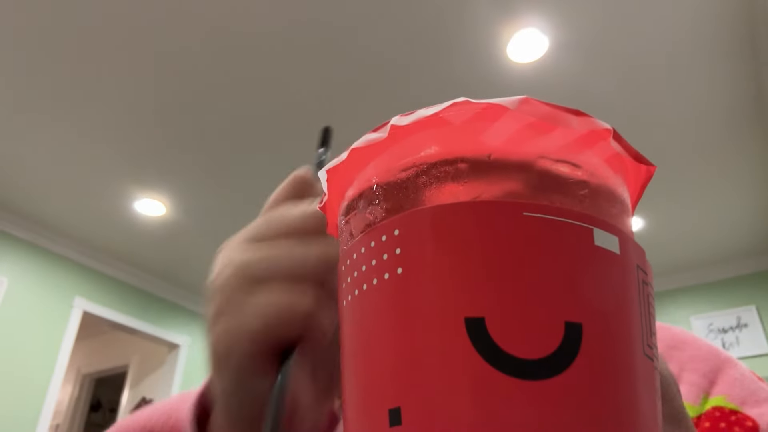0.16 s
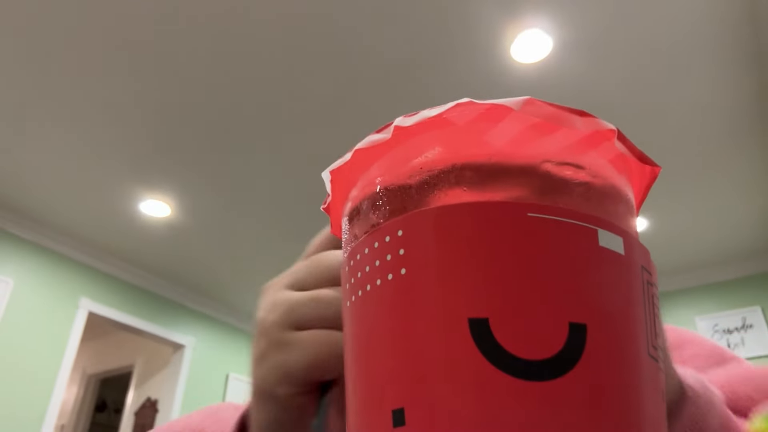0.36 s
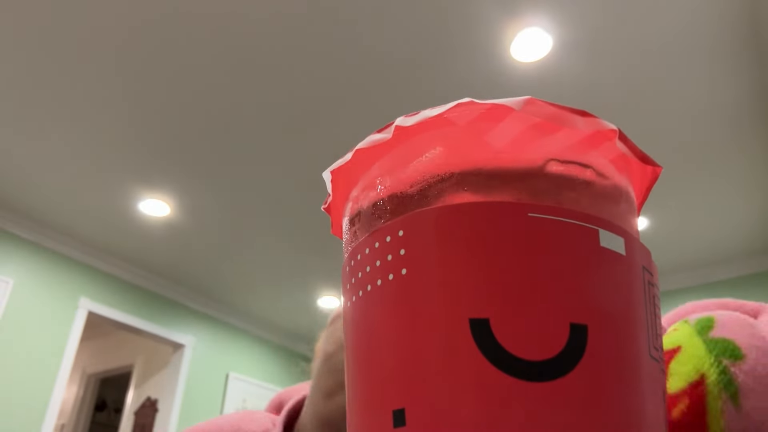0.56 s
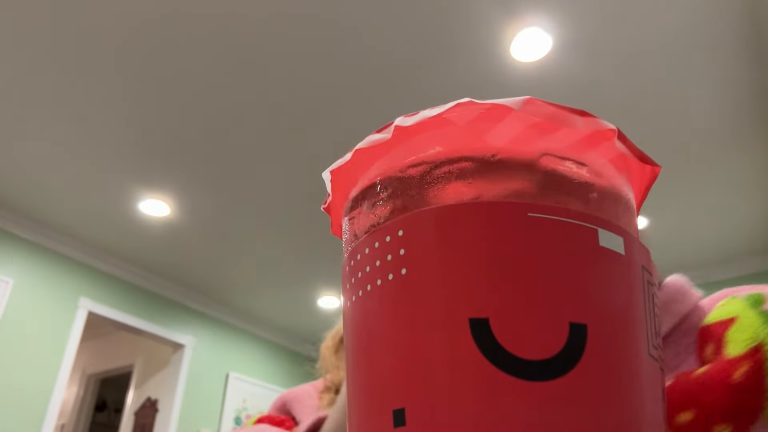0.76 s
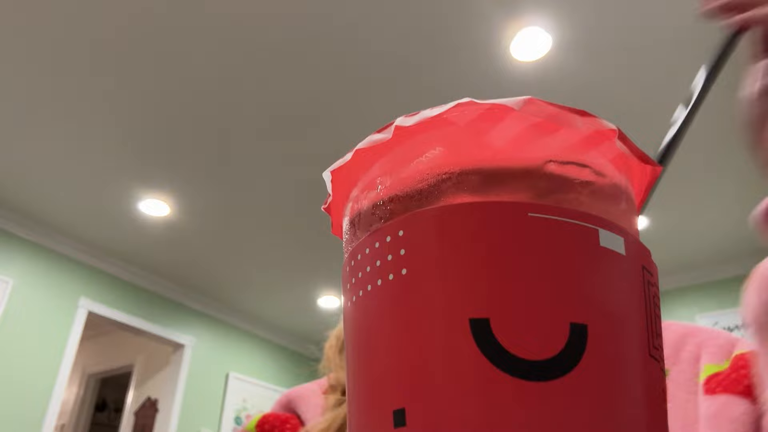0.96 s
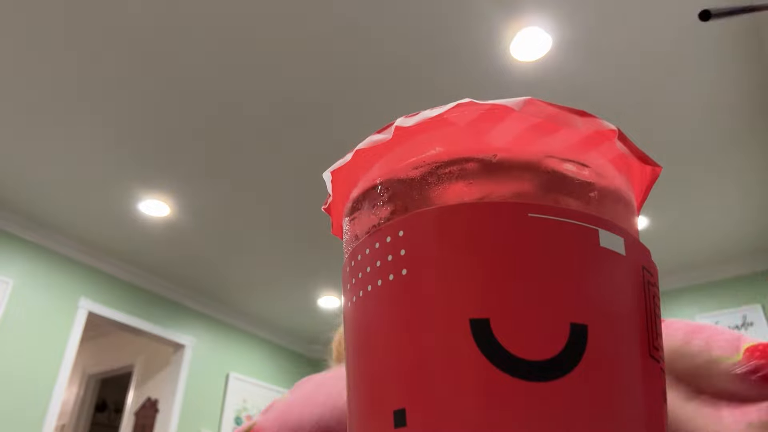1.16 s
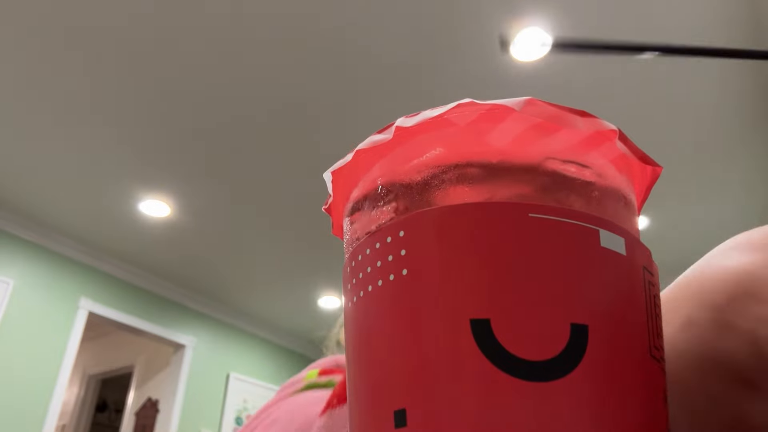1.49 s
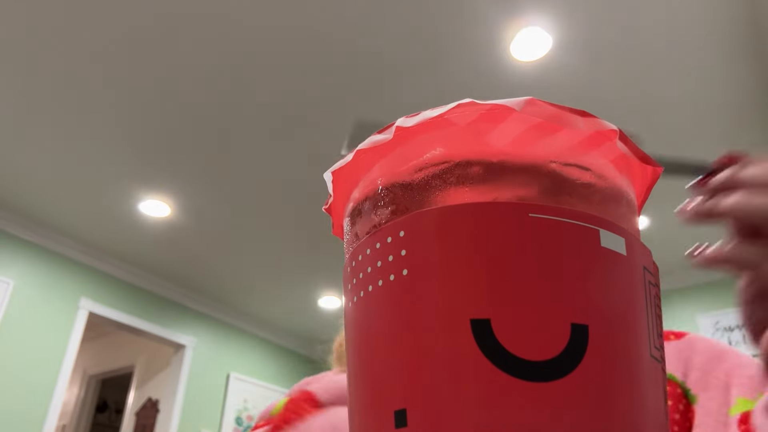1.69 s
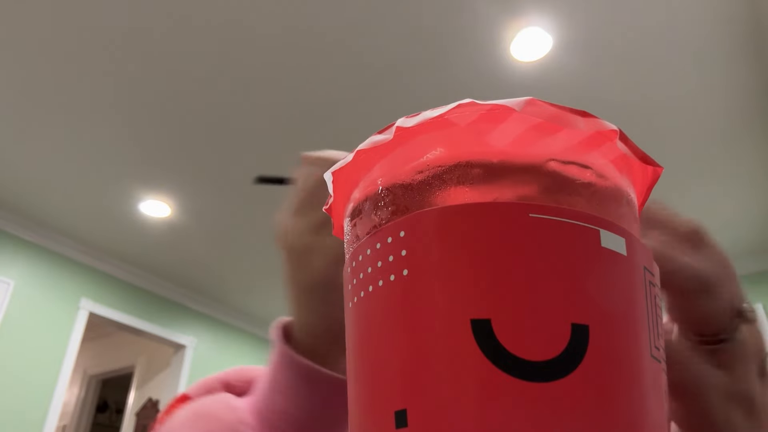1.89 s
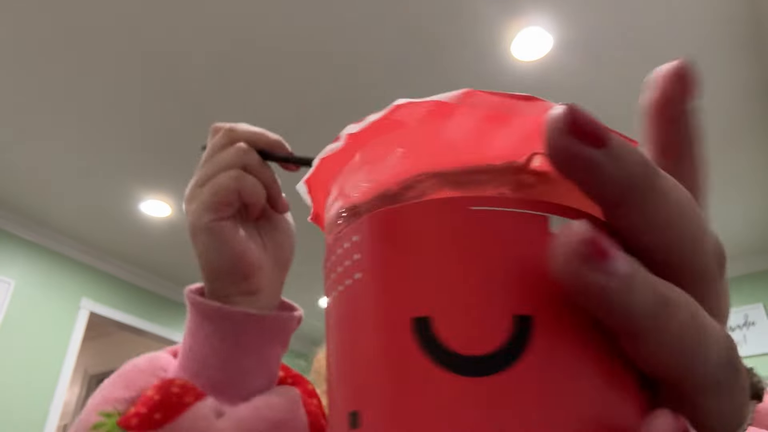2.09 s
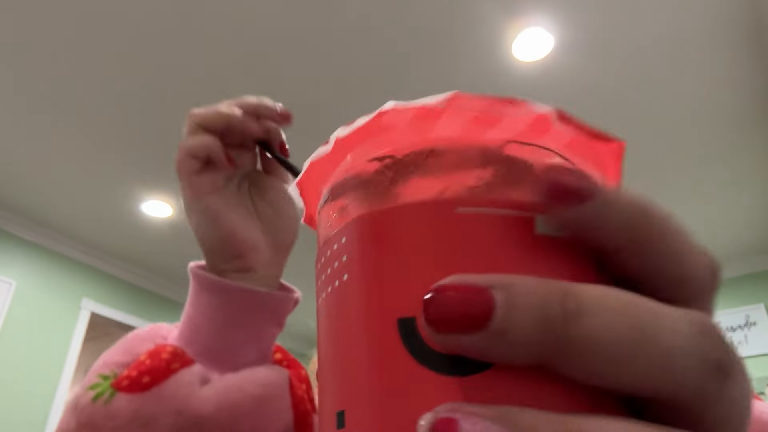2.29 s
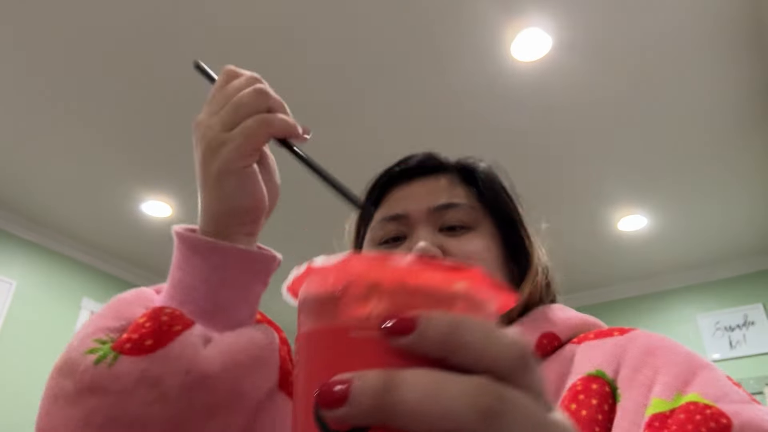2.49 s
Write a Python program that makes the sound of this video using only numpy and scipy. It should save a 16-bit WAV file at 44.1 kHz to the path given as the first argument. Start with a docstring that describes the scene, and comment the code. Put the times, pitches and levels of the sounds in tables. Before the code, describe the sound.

A plastic straw jabs at a drink cup's film lid, with taps, cracks and crinkling.

```python
"""A film-sealed drink cup is knocked about by a plastic straw and fingers, on a table beside a phone.
Blows ring the cup and thump the table, the straw taps, and thin plastic cracks, rasps and rustles.
At the end the cup is dragged and lifted, and its contents knock and rattle inside.
The phone's left port hears the bass weaker and phase-shifted, and the cup's low ring nearly inverted."""
import sys
import numpy as np
from scipy import signal
from scipy.fft import rfft, irfft, next_fast_len
from scipy.io import wavfile

SR = 44100
rng = np.random.default_rng(int(sys.argv[2]) if len(sys.argv) > 2 else 0)


def master(y):
    """Save y as 16-bit WAV."""
    cut = np.clip(np.atleast_2d(y).T, -1, 1)
    pcm = np.round(cut * 32767)  # scale
    wavfile.write(sys.argv[1], SR, pcm.astype(np.int16))


N = 116865


def undb(db):
    return 10 ** (np.asarray(db) / 20)


def unit(x):
    return x / np.sqrt(np.mean(x ** 2))


def noise(n=N):
    return rng.standard_normal(n)


def band(x, lo_hz, hi_hz):
    return signal.sosfilt(signal.butter(3, [lo_hz, hi_hz], "band", fs=SR, output="sos"), x)


def fader(table, column):
    points = np.array(table)
    return undb(np.interp(np.arange(N) / SR, points[:, 0], points[:, column]))


def fade(t, t60):
    return np.exp(-np.log(1000) * t / t60)


def ring(modes, detune=0.):
    """Struck modes dying away, peak 1; detune is their random pitch spread."""
    t = np.arange(SR // 6) / SR
    ratios = 1 + detune * noise(len(modes))
    y = sum(undb(db) * fade(t, t60) * np.sin(2 * np.pi * hz * ratio * t)
            for (hz, db, t60), ratio in zip(modes, ratios))
    return y / np.abs(y).max()


def add(out, start_s, sound, peak_db):
    i = int(start_s * SR)
    out[i:i + len(sound)] += (undb(peak_db) * sound / np.abs(sound).max())[:N - i]


def grains(per_s, spread_db):
    """Random tiny clicks, some larger than the rest."""
    clicks = (rng.random(N) < per_s / SR) * noise()
    return clicks * undb(spread_db * np.minimum(rng.exponential(size=N), 3))


def crinkle():
    """Sparse creases, each a short burst of noise, over a little hiss."""
    burst = fade(np.arange(SR // 50) / SR, t60=0.014)
    gate = signal.fftconvolve(np.abs(grains(per_s=250, spread_db=2.5)), burst)[:N]
    return (unit(gate) + 0.7) * noise()


# Fader moves for the table's rumble: time_s, low_db, high_db
RUMBLE_LEVELS = [(0.0, -28, -28.5), (0.15, -66.5, -91), (0.24, -30.5, -53), (0.38, -62, -67),
                 (0.47, -44, -57), (0.66, -74.5, -57), (0.92, -61, -71.5), (1.03, -67.5, -74),
                 (1.33, -67, -74), (1.59, -68, -49), (1.81, -65, -73.5), (1.98, -68.5, -69),
                 (2.14, -59.5, -112), (2.52, -63, -46), (2.65, -46.5, -89)]

def table_rumble():
    """The table top rumbles restlessly in two bass bands."""
    low = fader(RUMBLE_LEVELS, 1) * unit(band(noise(), 33, 110.3))
    high = fader(RUMBLE_LEVELS, 2) * unit(band(noise(), 200, 332))
    return undb(7) * low + undb(5) * high


# Fader moves for the plastic's rustle: time_s, treble_db, mid_db
RUSTLE_LEVELS = [(0.0, -51, -43), (0.11, -70.5, -80), (0.25, -68.5, -63), (0.5, -67, -65.5),
                 (0.59, -60, -50.5), (0.73, -49.5, -59), (0.8, -44, -63), (0.96, -62.5, -61.5),
                 (1.17, -58, -67.5), (1.48, -65.5, -60), (1.61, -57.5, -48.5), (1.75, -71.5, -67),
                 (1.94, -74.5, -72.5), (2.01, -53, -38.5), (2.12, -58, -41.5), (2.17, -67, -45.5),
                 (2.53, -55.5, -41.5), (2.65, -70, -99)]
# Tone of the film's treble: freq_hz, gain_db
FILM_EQ = [(3290, -42.5), (5600, -13), (7070, -15), (9510, -11), (11500, -8), (15000, -18), (16100, -40.5),
           (16400, -49)]

def film_rustle(grab_s=1.95):
    """Thin plastic rustles: bright fizz over crinkling mids, both swelling with each rasp."""
    freqs, eq = np.fft.rfftfreq(N, 1 / SR), np.array(FILM_EQ)
    colour = undb(np.interp(np.log(freqs + 1), np.log(eq[:, 0]), eq[:, 1], left=-60))
    fizz = unit(grains(per_s=1900, spread_db=4.5)) + 0.98 * noise()
    treble = unit(irfft(rfft(fizz) * colour, N))
    creases = crinkle()
    # Before the grab the straw scrapes in a narrow band; after it the whole cup crinkles.
    narrow, wide = unit(band(creases, 2600, 4400)), unit(band(creases, 2830, 6220))
    mids = np.where(np.arange(N) < grab_s * SR, narrow, wide)
    treble_gain = undb(0.5) * fader(RUSTLE_LEVELS, 1) + rasp_envelope(3)
    mid_gain = undb(-8.5) * fader(RUSTLE_LEVELS, 2) + rasp_envelope(4)
    return treble_gain * treble + mid_gain * mids


# Fader moves for the rattle: time_s, level_db
RATTLE_LEVELS = [(0.0, -46.5), (0.13, -78), (0.26, -80.5), (0.39, -72.5), (1.53, -67), (1.79, -79),
                 (2.01, -106.5), (2.04, -38), (2.15, -50.5), (2.19, -45), (2.43, -41.5), (2.65, -42.5)]
# Resonances of the rattle: pitch_hz, level_db, t60_s
RATTLE_RING = [(799, -14, 0.14), (1050, -7, 0.016), (1110, -0.5, 0.0093), (1370, -4, 0.031),
               (1623, -17.5, 0.0042)]

def contents_rattle():
    """Hard pieces jostle in the cup, a dense patter of ringing clicks."""
    patter = unit(grains(per_s=250, spread_db=1)) + 0.4 * noise()
    rattle = signal.fftconvolve(patter, ring(RATTLE_RING))[:N]
    return undb(1) * fader(RATTLE_LEVELS, 1) * unit(rattle)


# Thumps in the table top: start_s, level_db, pitch_hz
THUMP_HITS = [(.005, -33, 50), (0.04, -63, 58.6), (0.161, -21, 122), (0.175, -25, 64.2),
              (0.208, -23.5, 164), (0.241, -23, 216.3), (0.251, -32.5, 36.06), (0.268, -35, 185),
              (0.431, -32, 108), (0.455, -34, 44.2), (0.518, -45, 65.3), (0.832, -47.5, 113.5),
              (0.913, -43, 51), (1.155, -48, 95.4), (1.413, -52, 94), (1.511, -40.5, 84.7),
              (1.522, -46, 44.6), (2.008, -34, 114), (2.014, -26.5, 72.9), (2.028, -45, 37.3),
              (2.468, -32, 118.6), (2.526, -36.5, 64)]

def table_thumps(rise_s=0.0072, ring_cycles=21.7, sag=0.22):
    """The table booms: a low tone that sags onto its pitch, with a rough knock on top."""
    out, t = np.zeros(N), np.arange(SR // 2) / SR
    for start_s, db, hz in THUMP_HITS:
        turns = hz * np.cumsum(1 + sag * fade(t, t60=0.1)) / SR + 0.2 * rng.standard_normal()
        boom = (1 - np.exp(-t / rise_s)) * fade(t, ring_cycles / hz) * np.sin(2 * np.pi * turns)
        knock_shape = (1 - np.exp(-t / 0.015)) * fade(t, t60=0.12)
        knock = unit(band(noise(len(t)), 130, 380)) * knock_shape
        add(out, start_s, boom + undb(-5) * knock, db + 8.5)
    return out


# Cracks in the plastic: start_s, level_db, centre_hz
CRACK_HITS = [(0.0204, -33, 10200), (0.0474, -39.5, 9060), (0.1251, -19, 12500), (0.1304, -24, 10700),
              (0.15, -5, 13200), (0.1769, -17, 11630), (0.196, -25, 10200), (0.2163, -21, 8500),
              (0.2232, -16.5, 12200), (0.2311, -25, 7600), (0.2495, -29, 9750), (0.4773, -36.5, 9840),
              (0.5804, -35, 9400), (0.6358, -38, 10300), (0.6594, -36, 10800), (0.7008, -47, 9550),
              (0.82, -26.5, 10800), (0.9244, -47, 8700), (0.9972, -32.5, 10150), (1.0573, -37, 11500),
              (1.0676, -37.5, 11100), (1.1562, -35, 8700), (1.1607, -27.5, 10850), (1.295, -43.5, 10800),
              (1.337, -35, 9300), (1.3376, -31.5, 8700), (1.431, -34, 8750), (1.5176, -22, 8600),
              (1.5298, -12.5, 10100), (1.548, -23.5, 7800), (1.5751, -27.5, 9410), (1.9594, -25, 9400),
              (1.9746, -21.5, 9500), (1.9959, -16.5, 9800), (2.1296, -29, 9400), (2.2677, -35, 11700),
              (2.2732, -39, 6240), (2.2957, -34.5, 5470), (2.3226, -49, 6070), (2.3293, -30.5, 8700),
              (2.3471, -27.5, 10500), (2.4645, -29, 8100), (2.576, -36.5, 7300), (2.636, -33, 12100)]

def film_cracks(rise_s=0.00024, snap_s=0.0047, tail_s=0.043):
    """Thin plastic cracks: a bright snap of noise with a faint tail."""
    out, t = np.zeros(N), np.arange(SR // 12) / SR
    shape = (1 - np.exp(-t / rise_s)) * (fade(t, snap_s) + undb(-15.5) * fade(t, tail_s))
    for start_s, db, hz in CRACK_HITS:
        crack = band(noise(len(t)) * shape, hz * 0.55, min(hz * 1.5, 0.45 * SR))
        add(out, start_s, crack, db + 3)
    return out


# Plastic sliding on plastic: start_s, swell_s, hold_s, treble_db, mid_db, hum_db
RASP_STROKES = [(0.108, 0.017, 0.025, -47, -52, -60), (0.126, 0.022, 0.0079, -23, -35, -22.5),
                (0.162, 0.0075, 0.0049, -49, -43, -17), (0.202, 0.0015, 0.057, -48, -54.5, -53),
                (0.641, 0.015, 0.08, -54.5, -53, -83), (0.76, 0.061, 0.091, -56, -61, -73),
                (0.909, 0.015, 0.0027, -34, -57.5, -79), (1.136, 0.013, 0.048, -70, -57, -68),
                (1.443, 0.005, 0.034, -56, -81.5, -70), (1.501, 0.0095, 0.012, -32.5, -43, -36),
                (1.538, 0.0062, 0.042, -56, -56, -39.5), (1.947, 0.0066, 0.05, -41, -48, -52.5),
                (2.111, 0.063, 0.023, -34.5, -56.5, -59), (2.247, 0.051, 0.096, -52.5, -43, -36.5)]

def rasp_envelope(column, release_s=0.059):
    """Gain of the sliding for one level column: each stroke swells, holds and stops."""
    gain, t = np.zeros(N), np.arange(N) / SR
    for stroke in RASP_STROKES:
        start_s, swell_s, hold_s = stroke[:3]
        swell = np.clip((t - start_s) / swell_s, 0, 1) ** 2
        release = fade(np.maximum(t - (start_s + swell_s + hold_s), 0), release_s)
        gain += undb(stroke[column]) * swell * release
    return gain


# Resonances of the cup: pitch_hz, level_db, t60_s
CUP_MODES = [(297.8, 4.5, 0.037), (411, -5.5, 0.057), (513, 7, 0.091), (672, 3, 0.066), (859, -5.5, 0.064),
             (1230, -14.5, 0.093), (1640, -8.5, 0.034), (1870, -4, 0.027)]

def cup_hum():
    """Sliding makes the cup hum roughly; the hand halves its ring time."""
    damped = [(hz, db / 2, t60 / 2) for hz, db, t60 in CUP_MODES]
    hum = signal.fftconvolve(crinkle(), ring(damped))[:N]
    return unit(band(hum, 263, 2533)) * (rasp_envelope(5) + undb(-64))


# Taps of the straw: start_s, level_db, tilt_db_per_khz
TAP_HITS = [(0.1304, -39, -1), (0.152, -18, 4.5), (0.4294, -44, -19), (0.5075, -32, -5.5),
            (0.8183, -32, 13), (0.8246, -26.5, 3.5), (0.9097, -40, -28), (1.147, -36.5, 0.5),
            (1.2465, -48, -5), (1.4048, -34, 0.5), (1.512, -30, -11), (1.5296, -24.5, -17),
            (1.6332, -37, -1), (1.8346, -55.5, -1), (2.063, -33, -7), (2.464, -18, 2.5), (2.538, -34, 16),
            (2.5753, -35.5, 9), (2.6194, -30, -19)]
# Resonances of the straw: pitch_hz, level_db, t60_s
STRAW_MODES = [(2120, 0, .022), (2400, -1, .016), (2890, -2, .014), (3500, -2, .012), (4300, -7, .007)]

def straw_taps(rise_s=0.003, scrape_s=0.02, tail_s=0.11):
    """A tap scrapes for a moment, rings the tube and leaves a short rough tail."""
    out, t = np.zeros(N), np.arange(SR // 6) / SR
    push = (1 - np.exp(-t / rise_s)) * (fade(t, scrape_s) + undb(-16.5) * fade(t, tail_s))
    for start_s, db, tilt in TAP_HITS:
        modes = [(hz, mode_db + tilt * hz / 1000, t60) for hz, mode_db, t60 in STRAW_MODES]
        tap = signal.fftconvolve(noise(len(t)) * push, ring(modes, detune=0.034))
        add(out, start_s, band(band(tap, 1950, 10000), 1950, 10000), db)
    return out


# Blows on the cup: start_s, level_db
BLOW_HITS = [(0.1545, -8.5), (0.183, -22.5), (0.21, -26.5), (0.241, -20.5), (0.271, -26.5), (0.825, -49.5),
             (0.929, -51), (0.964, -51), (1.31, -51), (1.415, -54.5), (1.507, -35.5), (1.532, -39.5),
             (1.995, -41), (2.006, -26.5), (2.269, -38.5), (2.306, -39), (2.468, -34), (2.507, -35.5)]

def cup_blows(scrape_s=0.0095, octaves_per_db=0.16):
    """Each blow is a short rough push that rings the cup; softer blows are duller."""
    out, t = np.zeros(N), np.arange(SR // 50) / SR
    for start_s, db in BLOW_HITS:
        top_hz = max(5650 * 2 ** (octaves_per_db * db), 600)
        push = band(noise(len(t)) * np.sqrt(t) * fade(t, scrape_s), 194.6, top_hz)
        add(out, start_s, signal.fftconvolve(ring(CUP_MODES, detune=0.0068), push), db + 10)
    return out


# Knocks of the cup's contents: start_s, level_db, pitch_hz
KNOCK_HITS = [(0.155, -10.5, 945), (0.709, -45.5, 1374), (0.726, -44, 1450), (0.926, -41, 1114),
              (1.533, -25, 824), (1.561, -33.5, 760), (1.9971, -13.5, 940), (2.004, -29.5, 1247),
              (2.011, -32, 1400), (2.0536, -32.5, 1388), (2.0833, -34, 1840), (2.097, -29.5, 1430),
              (2.1225, -31.5, 1193), (2.148, -36.5, 1393), (2.194, -41, 1130), (2.2047, -31.5, 1156),
              (2.226, -38, 1190), (2.2493, -25, 934), (2.2792, -29, 1050), (2.2989, -21, 1150),
              (2.3236, -22, 1400), (2.389, -27.5, 1017), (2.4405, -33, 1342), (2.4605, -46, 1290),
              (2.5108, -18.5, 1218), (2.5225, -25.5, 1280), (2.5336, -25, 1284), (2.576, -31.5, 1402),
              (2.5902, -32.5, 1260), (2.6209, -26.5, 1347), (2.6414, -25, 1413)]

def contents_knocks(ring_s=0.038):
    """Hard pieces knock inside the cup one by one, each ringing three short modes."""
    out, t = np.zeros(N), np.arange(SR // 200) / SR
    for start_s, db, hz in KNOCK_HITS:
        modes = [(hz, 0, ring_s), (hz * 1.22, -6, ring_s * 0.53), (hz * 1.5, -9, ring_s * 0.26)]
        contact = noise(len(t)) * fade(t, t60=0.011)
        add(out, start_s, np.convolve(ring(modes), contact), db + 1)
    return out


def sources():
    return (table_rumble() + film_rustle() + contents_rattle() + table_thumps() + film_cracks()
            + cup_hum() + straw_taps() + cup_blows() + contents_knocks())


# The phone's left port against its right: freq_hz, gain_db, phase_rad, indirect_share
LEFT_PORT = [(30, -11, 1.2, .95), (70, -6, 1.5, .85), (130, -3, 1.1, .9), (300, -7, 2.5, .45),
             (600, -6, 2.5, .2), (1000, -3.5, 1.5, .6), (2000, -2, -1.2, .8), (4000, -3, -1.2, .8),
             (5500, -2, -2.3, .65), (7500, 0, -1.3, .3)]

def scene(lead_s=0.00008, lead_from_hz=7500):
    """The left port hears weaker, phase-shifted bass, early treble and some sound by other paths."""
    right, indirect = sources(), sources()
    size = next_fast_len(N + SR // 4)
    freqs, port = np.fft.rfftfreq(size, 1 / SR), np.array(LEFT_PORT)
    db, phase, share = (np.interp(np.log(freqs + 1), np.log(port[:, 0]), port[:, k]) for k in (1, 2, 3))
    phase += 2 * np.pi * lead_s * np.maximum(freqs - lead_from_hz, 0)
    blend = np.sqrt(1 - share ** 2) * rfft(right, size) + share * rfft(indirect, size)
    left = irfft(blend * undb(db) * np.exp(1j * phase), size)[:N]
    return np.array([left, right])


def record(dry, ceiling=0.86, top_hz=16400):
    """The phone clips the loudest peak and cuts the top."""
    lowpass = signal.ellip(8, 0.2, 70, top_hz, fs=SR, output="sos")
    return signal.sosfilt(lowpass, np.clip(dry, -ceiling, ceiling))


dry = scene()
out = record(dry)
master(out)
```